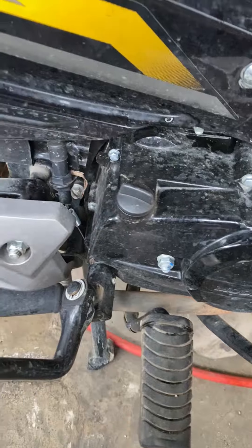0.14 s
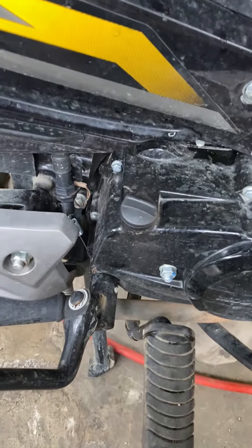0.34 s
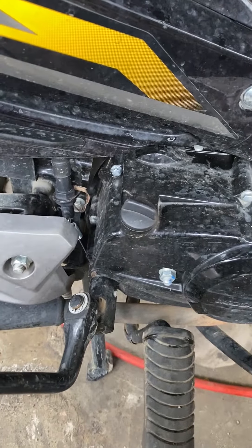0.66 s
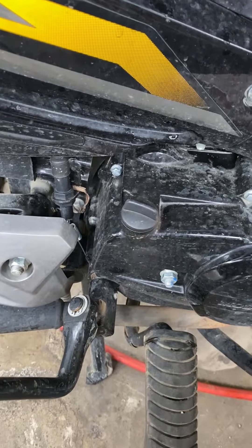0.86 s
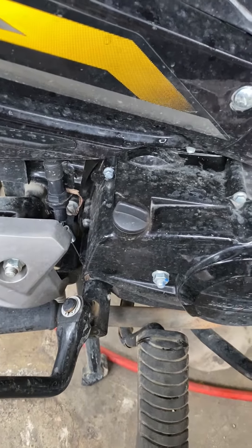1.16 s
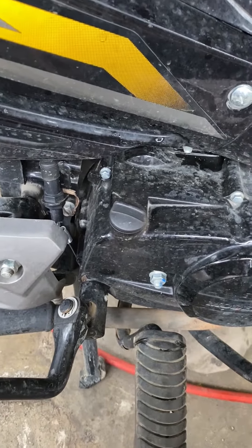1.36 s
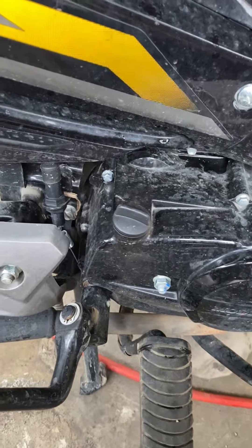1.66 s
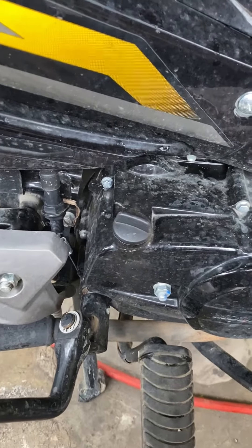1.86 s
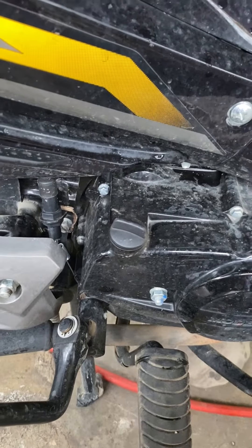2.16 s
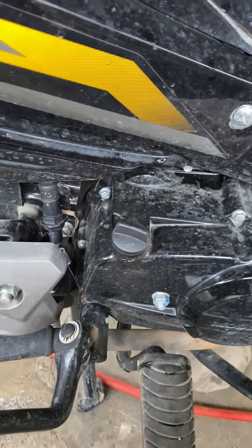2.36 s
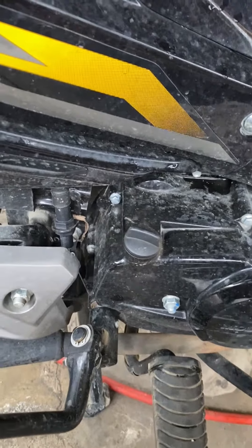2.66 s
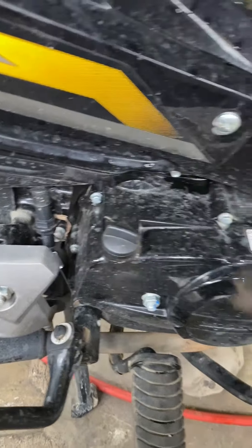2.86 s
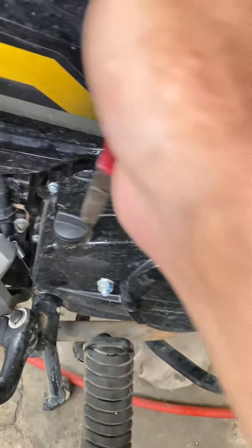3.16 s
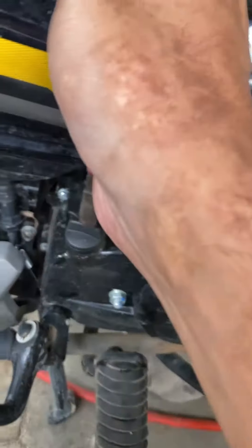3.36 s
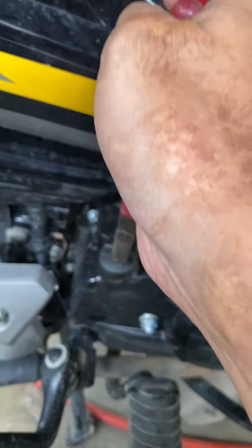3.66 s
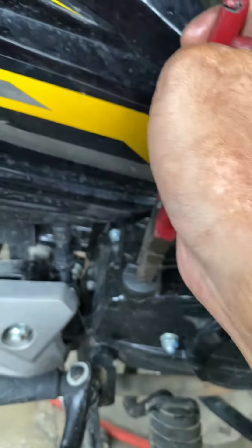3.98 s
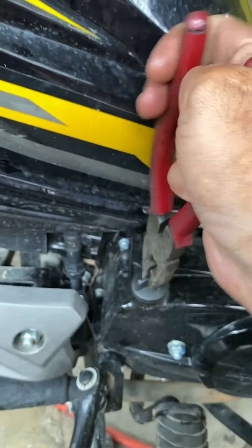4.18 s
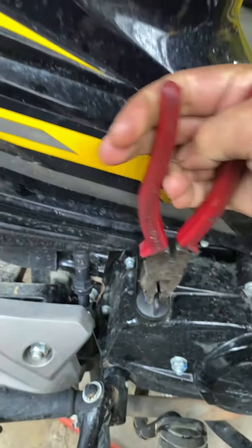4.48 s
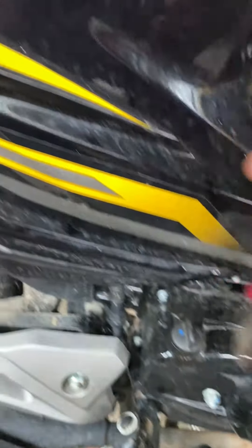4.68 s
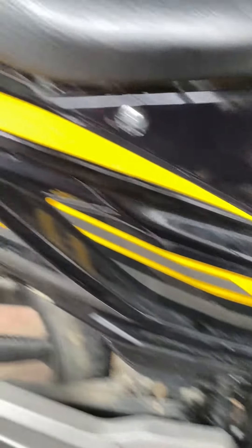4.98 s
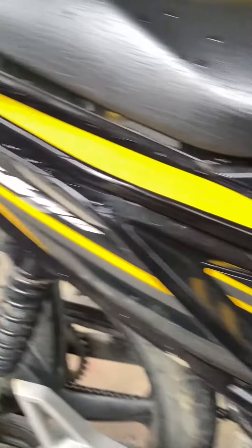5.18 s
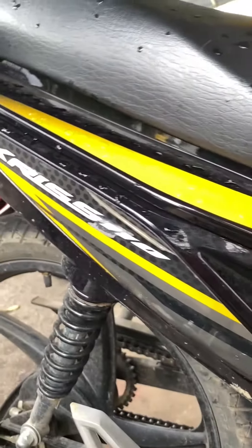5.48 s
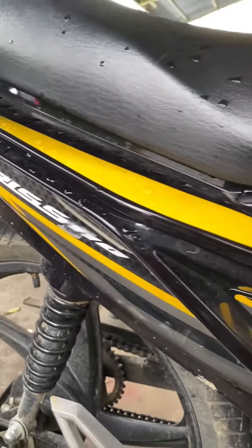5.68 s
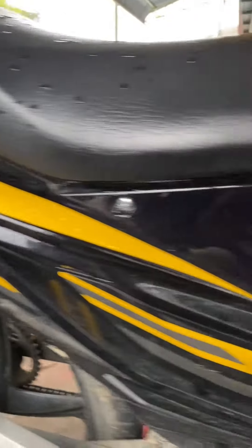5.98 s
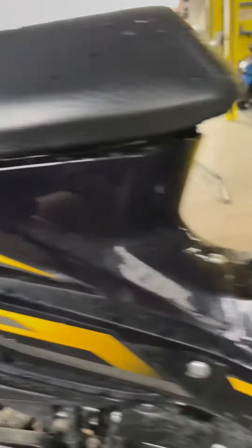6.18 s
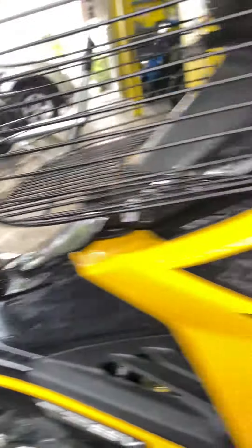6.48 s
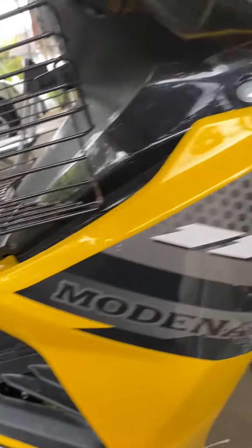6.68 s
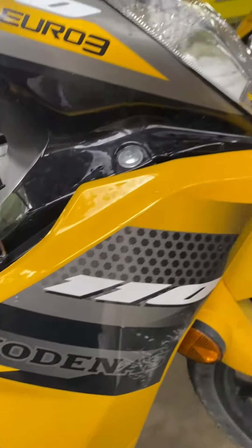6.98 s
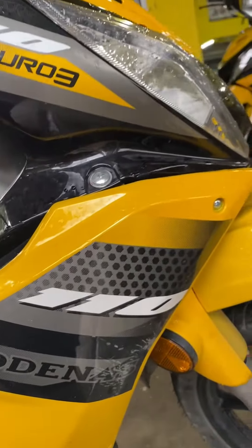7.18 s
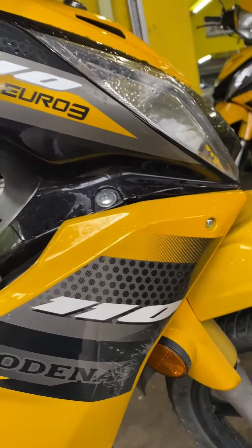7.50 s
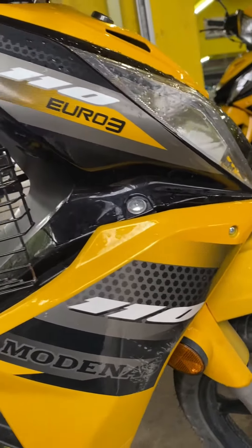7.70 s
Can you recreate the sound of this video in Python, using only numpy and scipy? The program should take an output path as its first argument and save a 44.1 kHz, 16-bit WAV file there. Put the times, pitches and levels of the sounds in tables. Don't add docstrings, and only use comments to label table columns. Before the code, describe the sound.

Close metallic ticks, a hard tool clack and plier taps over low putting motorbike engines, tyre rumble and brief whistling air puffs.

```python
import sys
import numpy as np
from scipy import signal
from scipy.fft import rfft, irfft, next_fast_len
from scipy.io import wavfile
from scipy.ndimage import uniform_filter1d, map_coordinates

SR = 44100
rng = np.random.default_rng(int(sys.argv[2]) if len(sys.argv) > 2 else 0)


def linear_from_db(decibels):
    return 10 ** (np.asarray(decibels, float) / 20)


def transcribe(u):
    v = np.clip(np.atleast_2d(u).T, -1, 1)
    q = np.round(v * 32767).astype(np.int16)
    wavfile.write(sys.argv[1], SR, q)


N = 345680

# (time [s], strength [dB], nearness [dB])
TRAFFIC = [(0, 5.5, 1), (.15, 0, 8), (.46, 5, 6.5), (.7, 2.5, 5.5), (1.2, 0.5, 0.5), (1.5, 0, 1),
           (1.9, -1.5, 1), (2.4, 0.5, -0.5), (3.1, -1, -1), (3.6, 0, -1), (4.06, 3, -5.5), (4.84, -2, -5.5),
           (5.3, -0.5, -5), (5.6, -3, -2.5), (6.2, -2, -4.5), (7.0, 2.5, -6), (7.66, 3.5, -5.5),
           (7.84, 2, -2)]
# (time [s], level [dB])
LORRY = [(0, -62), (1.2, -62.5), (1.9, -52.5), (2.4, -53), (3.0, -56.5), (3.7, -49.5), (4.3, -52.5),
         (4.85, -47.5), (5.3, -54.5), (6.2, -56), (7.84, -63)]
# (frequency [Hz], width [Hz], level [dB])
TYRE_CAVITIES = [(785, 20, -4), (1260, 250, -2.5)]
# (frequency [Hz], density [dB per Hz])
ROAD_COLOUR = [(15, -48.5), (30, -9), (60, -1), (150, 2.5), (220, -8), (300, -9.5), (420, -19.5),
               (600, -28.5), (1000, -34), (2500, -40.5), (4100, -45), (7500, -54.5), (12000, -67),
               (15500, -81)]

# (frequency [Hz], level [dB])
PORT_DIFFERENCE = [(60, -32), (100, -25.5), (160, -15), (270, -13), (450, -5.5), (740, -2), (1220, -4),
                   (2000, -3.5), (3300, -0.5), (5500, -1.5), (8500, 9), (12000, 9.5), (13200, 2),
                   (15000, -6)]
# (frequency [Hz], related share [0-1], phase [rad])
PORT_RELATION = [(60, .9, 1), (300, 0.6, 0.2), (700, 1, -1.7), (1500, .3, -0.85), (3000, .3, -2),
                 (5000, .5, 2.5), (9000, .6, 0.4), (15000, .4, 2.5)]
# (frequency [Hz], level [dB])
PORT_SUM_COLOUR = [(6500, 0), (8000, -3.5), (8800, -6.5), (10200, -16), (11200, -10.5), (11600, 0.5),
                   (13000, 0), (14500, -.6), (16000, 2)]

# (time [s], firing rate [Hz])
IDLING_SPEED = [(0.0, 23.2), (0.3, 22.27), (0.7, 21.35), (1.0, 21.1), (1.4, 21.65), (2.0, 21.95), (2.4, 23),
                (2.8, 23.4), (3.5, 23.7)]
# (time [s], level [dB])
IDLING_LOUDNESS = [(0, -5.5), (.2, 1), (.4, 0.5), (.7, 0), (1.0, -2.5), (1.3, -5), (1.7, -4), (2.4, -19.5),
                   (3.5, -15)]
# (order [1], level [dB], follows loudness [dB per dB])
IDLING_ORDERS = [(2, -48, 0.91), (3, -51, .6), (4, -34.5, 1.3), (5, -48, 1.5), (6, -32, 1.3),
                 (7, -39.5, 0.45), (8, -37.5, 0.38), (10, -42.5, 0.46), (12, -50.5, 0.66), (14, -53.5, .2)]
# (time [s], firing rate [Hz])
PULLING_SPEED = [(1.3, 24.12), (1.74, 23.99), (2.17, 24.19), (2.61, 24.45), (3.04, 24.85), (3.48, 25.33),
                 (4.13, 26.18), (5.01, 27.37), (5.44, 27.88), (6.1, 28.54), (6.75, 29.14), (7.4, 29.76),
                 (7.84, 30.3)]
# (time [s], level [dB])
PULLING_LOUDNESS = [(1.3, -13), (1.52, -12.5), (1.74, 3.5), (1.95, 1), (2.3, 1), (2.8, 0), (3.3, 1),
                    (3.7, -3), (4.1, -4), (4.5, 3), (5.0, -4.5), (5.5, -6), (6.2, -3.5), (6.7, -14),
                    (7.1, -6.5), (7.84, -5.5)]
# (order [1], level [dB], follows loudness [dB per dB])
PULLING_ORDERS = [(2, 0, 1), (3, -8, 1), (4, 0, .7), (5, 0, 1), (6, 0, 1.2), (7, 0, .6), (8, 0, .7),
                  (9, -1, .7), (10, -3, 1), (11, 4, 1), (12, -1, .7), (13, -2, .7)]
# (frequency [Hz], width [Hz], level [dB])
EXHAUST_PIPE = [(60, 33, -45), (109, 24.4, -32), (126.92, 7.26, -20.5), (143.7, 13.6, -29.5),
                (167.8, 9.8, -38), (187.5, 7.9, -48.5), (210.7, 11.2, -43), (252.6, 18, -43.5),
                (267.9, 7.1, -47.5), (300.4, 6.8, -48.5)]
# (time [s], firing rate [Hz])
LEAVING_SPEED = [(5.6, 23.5), (5.85, 23), (6.21, 24), (6.62, 25), (7.03, 25.93), (7.23, 27), (7.64, 28),
                 (7.84, 27)]
# (time [s], level [dB])
LEAVING_LOUDNESS = [(5.6, -26.5), (5.8, -3), (6.1, -6), (6.4, -2), (6.7, -3.5), (7.0, -2.5), (7.3, -2),
                    (7.6, 0), (7.84, 2.5)]
# (order [1], level [dB], follows loudness [dB per dB])
LEAVING_ORDERS = [(2, -37, 1.8), (3, -51.5, 1.3), (4, -45.5, 1.1), (5, -51, 2.7), (6, -33.5, 1.4),
                  (7, -43, -0.024), (8, -53, 1.6), (9, -50.5, 3.2), (10, -44, 1.6), (11, -48, -0.16),
                  (12, -47, 0.43), (13, -60.5, 0.46), (14, -59.5, 1.1), (16, -61, 1.8), (17, -58, 2.5),
                  (18, -57, 2.8)]
# (frequency [Hz], density [dB per Hz])
GAS_COLOUR = [(20, -70), (200, -22), (330, -3), (480, 0), (640, -2), (900, -20), (2500, -60), (16000, -120)]
# (time [s], frequency [Hz], level [dB])
PASSING_NOTE = [(0.0, 153.5, -53), (0.116, 153, -30.5), (0.3, 158.1, -37), (0.612, 133.6, -35),
                (0.738, 124.9, -35), (1.062, 125.6, -38), (1.22, 123.4, -30), (1.37, 126, -37.5),
                (1.5, 124.1, -22)]
# (time [s], frequency [Hz], level [dB])
LOW_HUM = [(2.0, 66.5, -55), (2.6, 68.24, -39), (3.0, 67.2, -33.5), (3.4, 65, -37.5), (3.75, 63, -47.5),
           (4.5, 63.4, -43), (5.1, 63, -36), (5.45, 63.2, -41), (6.0, 63.5, -42), (6.9, 63.8, -52)]

# (time [s], length [s], level [dB])
AIR_PUFFS = [
    (1.421, 0.061, -53),
    (4.798, 0.14, -44),
    (5.062, .14, -48.5),
]
# (frequency [Hz], density [dB per Hz])
AIR_COLOUR = [(1000, -5), (2200, 3.5), (5000, -3.5), (9000, -10.5), (12000, -13), (14000, -25.5),
              (16000, -27)]
# (time [s], length [s], level [dB])
WHISTLES = [
    (1.58, .27, -51),
    (5.082, .35, -47),
]

# (time [s], peak [dB], crack against ring [dB], left over right [dB])
WASHER_TICKS = [(0.0074, -20, 0.0058, -1.2), (0.0354, -25, 0.004, -0.21)]
SPANNER_TICKS = [
    (.2626, -35.5, 10.5, -6.5),
    (.9576, -12, -11, -3.5),
    (.9612, -17.5, -1.5, 1),
    (1.0222, -7.5, 0, -0.5),
    (2.0885, -31.5, -1, -4),
]
LOOSE_TICKS = [(1.1034, -21.5, 0, 2), (1.1055, -17.5, -2, 2)]
CLACKS = [
    (1.5155, -20, -5, 0.044),
    (1.5217, -6, 5.5, -0.57),
    (1.5238, -8, 4, .5),
    (1.527, -19, -5, 0.28),
]
RIM_BOUNCES = [(1.5462, -15, 3, -1.3), (1.5505, -23.5, 4, 0), (1.5618, -14.5, 3, 0), (1.564, -20, 3, 0.12),
               (1.5714, -15, 3, -0.95)]
CASE_TICKS = [(3.3826, -36.5, 11, -.5), (4.0684, -21.5, 1.3, -2), (4.0724, -33, 5.8, -.2),
              (5.3464, -36.5, 9, -2.2)]
PLIER_TAPS = [(3.5266, -9, -8, 0), (3.6697, -14.5, 2, 0.99)]

# (frequency [Hz], level [dB], t60 [s])
WASHER_MODES = [(2760, 1, 0.023), (3350, 0.5, 0.011), (5500, -2.5, 0.035)]
SPANNER_MODES = [(2680, -12, 0.0095), (3400, -12, 0.0085), (4280, -11, 0.023), (4940, -2.5, 0.014),
                 (5130, 3, 0.014), (5570, -10, 0.1), (6520, -5.5, 0.035), (7840, -3.5, 0.022)]
LOOSE_MODES = [(3300, -12, .01), (5150, -6, .014), (5570, -5, .1), (6500, -4, .016)]
DROPPED_MODES = [(1272, -21.5, 0.11), (2128, -8, 0.048), (3320, -34, 0.099), (4607, -4, 0.046),
                 (4970, -1, 0.025), (6000, 0.5, 0.011), (7560, -6.5, .012), (7671, 2.5, .014),
                 (8200, -13, .07), (10360, 5.5, 0.013), (12200, -18, 0.0069)]
RIM_MODES = [(3330, -21.5, 0.018), (6300, -1, .015), (8050, 2, .025), (7700, -18.5, .03),
             (10500, -8, 0.013)]
CASE_MODES = [(1750, -2, .01), (2750, 3, .005), (3150, 2, .005), (3550, 3, .005), (9000, 6, .005),
              (11000, 4, .006)]
PLIER_MODES = [(3310, -1.5, 0.025), (4300, -12, 0.0091), (5710, -11.5, 0.023), (6420, -3, 0.0091),
               (8500, -16, .026)]
# (frequency [Hz], density [dB per Hz])
CRACK_COLOUR = [(800, -32.5), (2500, -3), (5000, 3), (8000, 9), (11000, 5), (13000, -16), (16500, -25.5)]


def unit(x):
    return x / np.sqrt(np.mean(x ** 2) + 1e-20)


def along(points, hz, axis=1):
    cols = np.transpose(points)
    return np.interp(np.log(hz + 1), np.log(cols[0] + 1), cols[axis])


def curves(rows):
    s, *cols = np.transpose(rows)
    t = np.arange(N) / SR
    gate = np.clip(np.minimum(t - s[0], s[-1] - t) / .1 + 1, 0, 1)
    return [np.interp(t, s, c) for c in cols], gate


def wobble(rate):
    step = np.arange(int(N * rate / SR * 16) + 2) / 16
    knots = rng.standard_normal(int(step[-1]) + 4)
    return np.interp(np.arange(N) * rate / SR, step, map_coordinates(knots, [step]))


def filtered(x, response):
    m = next_fast_len(x.shape[-1] + 8192)
    return irfft(rfft(x, m) * response(np.fft.rfftfreq(m, 1 / SR)), m)[..., :x.shape[-1]]


def colour(points):
    return lambda hz: linear_from_db(along(points, hz))


def resonance(hz, centre, width):
    return 1 / (1 + ((hz - centre) / width * 2) ** 2)


def ports(x, other):
    difference = colour(PORT_DIFFERENCE)
    share = lambda hz: along(PORT_RELATION, hz)
    phase = lambda hz: along(PORT_RELATION, hz, axis=2)
    turned = filtered(x, lambda hz: difference(hz) * share(hz) * np.exp(1j * phase(hz)))
    side = turned + filtered(other, lambda hz: difference(hz) * np.sqrt(1 - share(hz) ** 2))
    return np.array([x + side, x - side])


def road():
    z = signal.stft(rng.standard_normal((2, N)), nperseg=512)[2]
    field = uniform_filter1d(uniform_filter1d(rng.standard_normal(z.shape[1:]), 5, 0), 20, 1)
    noise = signal.istft(z * linear_from_db(1.11 * unit(field)), nperseg=512)[1][:, :N]
    low = lambda hz: 1 / (1 + (hz / 550) ** 4)
    high = lambda hz: 1 / (1 + (2800 / (hz + 1)) ** 4)
    middle = lambda hz: 1 - low(hz) - high(hz)
    drone = lambda hz: sum(linear_from_db(db) * resonance(hz, c, w) for c, w, db in TYRE_CAVITIES)
    strength, near = curves(TRAFFIC)[0]
    (lorry_db,), _ = curves(LORRY)
    layers = [(low, -34.5 + 0.76 * strength + .01 * near),
              (middle, -46 + 0.95 * strength + 0.35 * near),
              (high, -53 + 0.67 * strength + 0.76 * near),
              (drone, lorry_db)]
    total = 0
    for share, level_db in layers:
        layer = filtered(noise, lambda hz: share(hz) * colour(ROAD_COLOUR)(hz))
        total = total + linear_from_db(level_db + 0.29 * wobble(4.6)) * layer / np.std(layer[0])
    return total


def engine(speed, loudness, orders, unsteady_db, jitter):
    (rate,), gate = curves(speed)
    turn = 2 * np.pi * (np.cumsum(rate) / SR + jitter * wobble(9))
    level = curves(loudness)[0][0]
    total = 0
    for order, db, follows in orders:
        size = linear_from_db(db + follows * level + unsteady_db * wobble(7))
        total = total + size * np.cos(round(order) * turn)
    return np.sqrt(2) * gate * total


def single_note(rows):
    rows = np.array(rows)
    return engine(rows[:, :2], rows[:, ::2], [(1, 0, 1)], unsteady_db=1.2, jitter=.02)


def exhaust_pipe(hz):
    return np.sqrt(sum(linear_from_db(2 * db) * resonance(hz, c, w) ** 2 for c, w, db in EXHAUST_PIPE))


def engines():
    pulling = engine(PULLING_SPEED, PULLING_LOUDNESS, PULLING_ORDERS, unsteady_db=.6, jitter=.0015)
    pulling = filtered(pulling, exhaust_pipe)
    idling = engine(IDLING_SPEED, IDLING_LOUDNESS, IDLING_ORDERS, unsteady_db=1.5, jitter=.004)
    leaving = engine(LEAVING_SPEED, LEAVING_LOUDNESS, LEAVING_ORDERS, unsteady_db=2.46, jitter=0.001)
    return pulling + idling + leaving + single_note(PASSING_NOTE) + single_note(LOW_HUM)


def chuffs():
    (rate,), gate = curves(LEAVING_SPEED)
    puffs = (1 + np.cos(2 * np.pi * np.cumsum(rate) / SR)) ** 2 / 2
    gas = unit(filtered(rng.standard_normal(N), colour(GAS_COLOUR)))
    return gate * puffs * gas * linear_from_db(-49.5 + 1.2 * curves(LEAVING_LOUDNESS)[0][0])


def air_valve():
    t = np.arange(N) / SR
    swell = 0
    for s, length, db in AIR_PUFFS:
        swell = swell + linear_from_db(db) * np.sin(np.pi * np.clip((t - s) / length, 0, 1)) ** 0.52
    air = swell * unit(filtered(rng.standard_normal((2, N)), colour(AIR_COLOUR)))
    rest_hz, drop_hz, sink_s = 4030, 1400, .035
    attack_s, release_s = .04, .18
    bands = [(1, -6, 400, 1.5), (1.06, -1, 600, 0), (1.16, -2, 1100, 0)]
    for s, length, db in WHISTLES:
        away = np.abs(t - s)
        turn = 2 * np.pi * np.cumsum(rest_hz + drop_hz * np.exp(-away / sink_s)) / SR
        shape = np.clip(np.minimum((t - s) / attack_s, (s + length - t) / release_s), 0, 1)
        for ratio, haze_db, spread, steady in bands:
            breath = steady + np.array([wobble(spread), wobble(spread)])
            level = linear_from_db(db + haze_db - 400 * (ratio - 1) * away)
            air = air + shape * level * breath * np.sin(ratio * turn)
    return air


def contacts(events, modes, crack_t60, lead):
    out, t = np.zeros((2, N + SR)), np.arange(SR // 5) / SR
    margin = 64
    sides = np.array([[1], [-1]])
    cracks = filtered(rng.standard_normal((len(events), len(t))), colour(CRACK_COLOUR))
    for (s, db, crack_db, pan_db), crack in zip(events, cracks):
        ring = 0
        for hz, level, t60 in modes:
            ring = ring + linear_from_db(level + rng.normal(0, 1.2) - 60 * t / t60) * np.sin(2 * np.pi * hz * t)
        hit = ring + linear_from_db(crack_db - 60 * t / crack_t60) * unit(crack)
        hit = hit * (1 - np.exp(-t / 0.00023))
        pair = filtered(np.r_[np.zeros(margin), hit], lambda hz: np.exp(1j * np.pi * hz * lead * sides))
        out[:, round(s * SR):][:, :pair.shape[1]] += linear_from_db(db - 5.5 + sides * pan_db / 2) * pair
    return out[:, margin:N + margin]


def tools():
    near = contacts(SPANNER_TICKS, SPANNER_MODES, crack_t60=0.012, lead=.000055)
    near = near + contacts(LOOSE_TICKS, LOOSE_MODES, crack_t60=0.022, lead=.000055)
    near = near + contacts(CLACKS, DROPPED_MODES, crack_t60=0.012, lead=.000059)
    near = near + contacts(RIM_BOUNCES, RIM_MODES, crack_t60=.016, lead=.000053)
    near = near + contacts(PLIER_TAPS, PLIER_MODES, crack_t60=0.004, lead=.00005)
    near = near + contacts(WASHER_TICKS, WASHER_MODES, crack_t60=0.019, lead=.00004)
    near = near + contacts(CASE_TICKS, CASE_MODES, crack_t60=0.0071, lead=.00005)
    t = np.arange(SR // 4) / SR
    tail = rng.standard_normal((2, len(t))) * linear_from_db(-60 * t / 0.024) * (t > .002)
    answer = signal.fftconvolve(near, tail / np.linalg.norm(tail[0]), axes=1)[:, :N]
    return near + linear_from_db(-8.0) * answer


def scene():
    far = road() + air_valve()
    distant = ports(far[0] + engines(), far[1])
    return distant + tools() + ports(chuffs(), 0 * far[1])


def band_limit(x):
    return signal.sosfilt(signal.butter(12, 16630, fs=SR, output="sos"), x)


def record(dry):
    top_hz = 15600
    total = filtered(dry[0] + dry[1], lambda hz: colour(PORT_SUM_COLOUR)(hz) * (hz < top_hz))
    apart = filtered(dry[0] - dry[1], lambda hz: hz < top_hz)
    pair = np.array([total + apart, total - apart]) / 2
    over = np.maximum(np.abs(apart) - .5, 0)
    t = np.arange(SR // 2) / SR
    pressed = lambda memory: np.tanh(np.abs(signal.fftconvolve(over, memory)[:N]) / 6)
    lag = (t / 0.27) ** 2 * np.exp(2 - 2 * t / 0.054)
    gain = 1 / (1 + 1.7 * pressed(lag))
    middle = filtered(pair, lambda hz: 1 / (1 + (350 / (hz + 1)) ** 4) / (1 + (hz / 1100) ** 4))
    duck = 1 / (1 + 3.4 * pressed(np.exp(-t / 0.046)))
    return band_limit(gain * (pair - (1 - duck) * middle))


dry = scene()
out = record(dry)
transcribe(out)
```